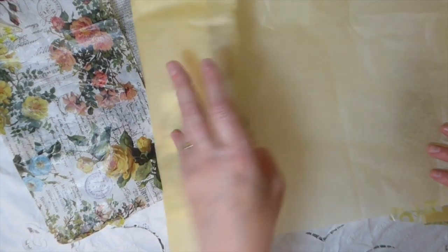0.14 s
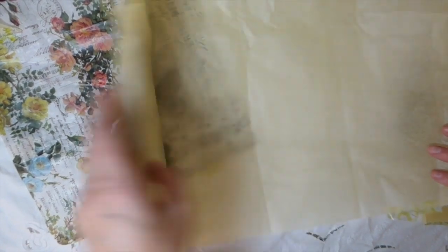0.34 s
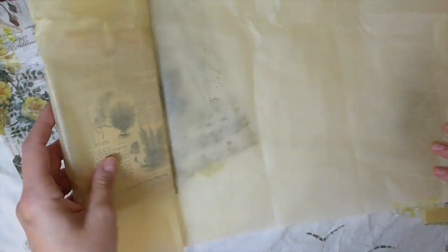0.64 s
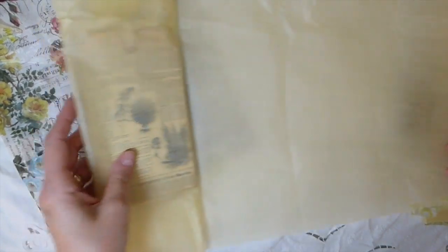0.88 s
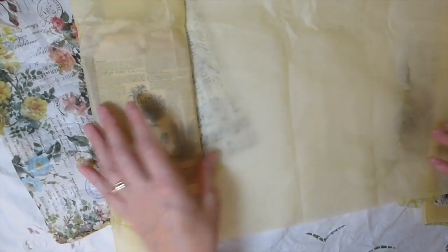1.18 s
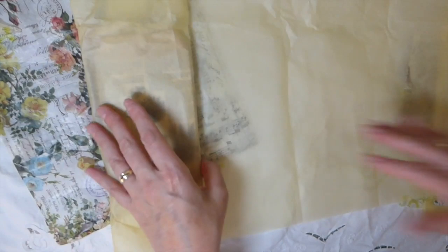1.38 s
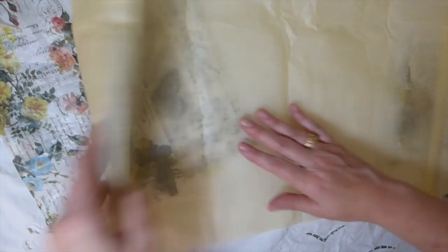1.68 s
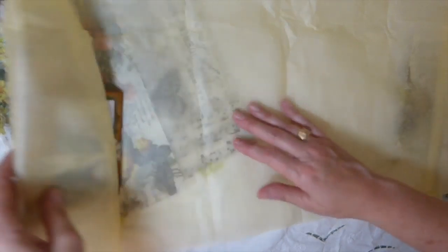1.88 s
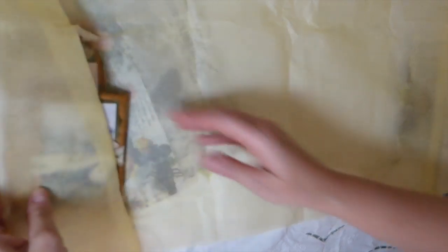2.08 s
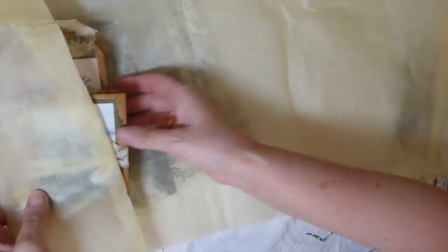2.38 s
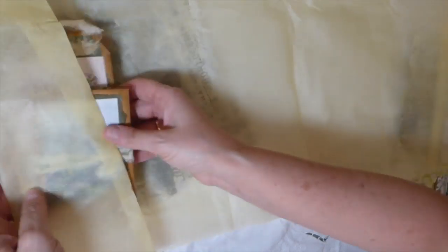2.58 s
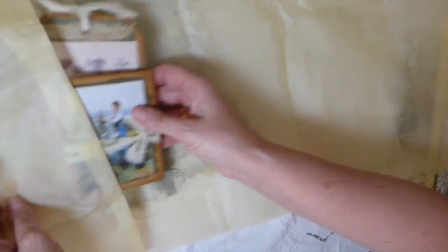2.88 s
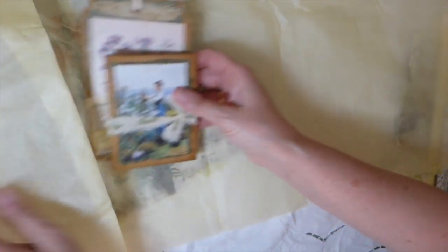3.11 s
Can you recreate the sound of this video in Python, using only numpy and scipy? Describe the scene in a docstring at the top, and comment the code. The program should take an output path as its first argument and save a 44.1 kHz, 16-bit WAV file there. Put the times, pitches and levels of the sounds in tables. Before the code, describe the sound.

Crisp thin paper crackling and sliding close up while being unfolded by hand indoors

```python
"""From the start, thin tissue paper is folded open by hand on a table, heard close up in a small room.
Creases snap as short noise bursts over a crackle of tiny ones; sheets slide and flap as coloured noise.
Soon light knocks of bellying paper and of the card frames inside join in, as damped resonances.
Later, short swells of resonant noise colour a few moments, and whole folds crumple in gritty swells.
Faint, steady noise is the air of the room throughout."""
import sys
import numpy as np
from scipy import signal
from scipy.fft import rfft, irfft, next_fast_len
from scipy.io import wavfile
from scipy.ndimage import uniform_filter1d, map_coordinates

SR = 44100
rng = np.random.default_rng(int(sys.argv[2]) if len(sys.argv) > 2 else 0)


def persist_wave(psi):
    """Save psi, clipped to +-1, as 16-bit WAV."""
    counts = np.round(np.clip(psi, -1, 1) * 32767).astype(np.int16)
    wavfile.write(sys.argv[1], SR, np.atleast_2d(counts).T)


N = 143325  # samples, 3.25 s


def amp(db):
    """Turn decibels into gain."""
    return 10 ** (np.asarray(db) / 20)


def unit(x):
    """Scale to an rms of 1."""
    return x / np.sqrt(np.mean(x ** 2) + 1e-20)


def along(points, hz):
    """Read a value between (Hz, value) points, with frequency on a log axis."""
    f, v = np.transpose(points)
    return np.interp(np.log(hz + 1), np.log(f + 1), v)


def filtered(x, response):
    """Multiply the spectrum of x by a response that depends on frequency."""
    m = next_fast_len(N + SR // 2)
    return irfft(rfft(x, m) * response(np.fft.rfftfreq(m, 1 / SR)), m)[..., :N]


def coloured(x, spectrum, size=4096):
    """Give x a spectrum without ringing ahead of time, keeping the power of white noise."""
    cepstrum = irfft(np.log(amp(along(spectrum, np.fft.rfftfreq(size, 1 / SR)))))
    # folding the second half onto the first makes the filter minimum phase
    cepstrum[1:size // 2] *= 2
    cepstrum[size // 2 + 1:] = 0
    ring = irfft(np.exp(rfft(cepstrum)))
    return signal.fftconvolve(x, ring[None] / np.linalg.norm(ring), axes=1)[:, :N]


def wobble(rate, at):
    """Draw a smooth random curve with rate knots per unit of at."""
    return map_coordinates(rng.standard_normal(size=4096), [at * rate], mode="wrap")


def swells(events, t):
    """Add up bell-shaped swells, each given by its peak time, level and half width."""
    return sum(amp(db) * np.exp(-.5 * ((t - s) / width) ** 2) for s, db, width in events)


def noise(apart):
    """Make stereo noise; apart is the side signal over the middle one."""
    mid, side = rng.standard_normal((2, N))
    return np.array([mid + apart * side, mid - apart * side])


def add(track, s, sound):
    """Mix a sound into a track at s seconds."""
    part = track[:, max(round(s * SR), 0):][:, :sound.shape[-1]]
    part += sound[..., :part.shape[1]]


TICK_DB, TICK_S = -2, .0007  # first instant of a buckle, over the burst that follows: dB, decay in s
TABLE_ECHO = 0.37  # gain of the mirror image of each facet in the table


def burst(rise, hold, t60, uneven_db, apart, pan_db, size=2048):
    """One facet of paper gives way: a sharp tick, then a spiky noise burst with a colour of its own."""
    t, hz = np.arange(size) / SR, np.fft.rfftfreq(size, 1 / SR)
    decay = amp(-60 * np.maximum(t - hold, 0) / t60)
    shape = (1 - np.exp(-t / rise)) * (decay + amp(TICK_DB) * np.exp(-t / TICK_S))
    spikes = amp(1.45 * wobble(1720, t))
    mid, side = rng.standard_normal((2, size)) * shape * spikes

    delay = rng.uniform(.0002, .002)  # s, the echo off the table
    echo = 1 + TABLE_ECHO * np.exp(-2j * np.pi * hz * delay)
    colour = amp(uneven_db * wobble(9.3, np.log(hz + 900))) * echo
    mid, side = irfft(rfft(np.roll([mid, side], 16, axis=1)) * colour)

    pan = amp(pan_db * rng.normal() * np.array([[.5], [-.5]]))
    level = np.sqrt(.004 * SR) / np.linalg.norm(mid)  # the energy of 4 ms at level 1
    return pan * np.array([mid + apart * side, mid - apart * side]) * level


# Creases that buckle. Each row: start in seconds, level in dB.
SNAPS = [(0.056, -35.5), (0.081, -36.5), (0.1162, -31), (0.1577, -34), (0.241, -37.5), (0.2662, -34),
         (0.2714, -27.5), (0.2924, -31.5), (0.3653, -30.5), (0.3701, -28.5), (0.439, -23), (0.455, -27.5),
         (0.5414, -33), (0.6039, -33.5), (0.6475, -33.5), (0.6793, -33.5), (0.6915, -29.5), (0.759, -38),
         (0.7915, -28), (0.8029, -31), (0.8636, -35.5), (0.915, -37), (0.9305, -38), (0.9784, -36.5),
         (1.007, -23), (1.064, -25.5), (1.144, -32.5), (1.1633, -36.5), (1.1823, -35.5), (1.2607, -38.5),
         (1.3146, -30), (1.319, -30), (1.3522, -34), (1.3846, -30.5), (1.4588, -29.5), (1.505, -29.5),
         (1.556, -25.5), (1.59, -27), (1.6285, -26.5), (1.691, -27), (1.7566, -26.5), (1.7764, -25),
         (1.7896, -30), (1.8282, -27.5), (1.835, -27.5), (1.8478, -25), (1.857, -25), (1.9333, -29.5),
         (1.955, -33), (1.961, -31), (1.9695, -30.5), (1.996, -31), (2.0723, -25), (2.095, -34.5),
         (2.174, -38.5), (2.2239, -33.5), (2.3377, -29), (2.359, -28.5), (2.417, -27), (2.441, -33.5),
         (2.554, -36), (2.607, -34.5), (2.6102, -30), (2.6694, -32.5), (2.716, -35), (2.7311, -28.5),
         (2.776, -32.5), (2.8006, -26.5), (2.8358, -28), (2.877, -27), (2.8854, -29), (2.935, -32),
         (2.9869, -27.5), (3.018, -33), (3.09, -38), (3.103, -39), (3.1191, -24.5)]
# The bright colour of cracking paper. Each row: frequency in Hz, relative strength per Hz in dB.
CRACK = [(80, -82), (300, -17.5), (1000, -14), (2200, -8.5), (4000, -4.5), (6000, -3), (8200, -5.5),
         (10000, 4.5), (11300, -1.5), (13000, -13.5), (15200, -24.5)]
# The duller colour of a flapping sheet. Each row: frequency in Hz, relative strength per Hz in dB.
FLAP = [(30, -26), (100, -37), (150, -10.5), (300, -5), (500, -1.5), (850, 3), (1400, 2), (2000, -3),
        (3500, -7), (8000, -32.5)]
SNAP_RISE_S, SNAP_HOLD_S, SNAP_T60_S = .00012, .0016, .02  # hold and decay of a typical crack
FLAP_T60_S, SNAP_FLAP_DB = .028, -15.5  # decay of the flap, and its level against the crack


def snaps():
    """Each crease cracks as it buckles and makes the sheet around it flap."""
    cracks, flaps = np.zeros((2, 2, N))
    for s, db in SNAPS:
        length = np.exp(0.1 * rng.normal())
        crack = burst(SNAP_RISE_S, SNAP_HOLD_S * length, SNAP_T60_S * length,
                      uneven_db=1.9, apart=.33, pan_db=2)
        flap = burst(SNAP_RISE_S, SNAP_HOLD_S, FLAP_T60_S, uneven_db=2.5, apart=.25, pan_db=2)
        add(cracks, s, amp(db) * crack)
        add(flaps, s, amp(db + SNAP_FLAP_DB) * flap)
    return coloured(cracks, CRACK) + coloured(flaps, FLAP)


# Whole folds that crumple at once. Each row: time of the peak in seconds, level in dB,
# half width in seconds.
CRUMPLES = [(1.685, -27.5, 0.0075), (1.783, -31, 0.014), (2.394, -32, 0.0098), (2.741, -35, 0.01),
            (2.835, -28, 0.012)]
CRUMPLE_LOW_DB = -13.5  # the flapping part, against the cracking part


def crumples():
    """Many creases give way together in a brief, gritty swell of noise."""
    t = np.arange(N) / SR
    grit = swells(CRUMPLES, t) * unit(amp(2.4 * wobble(1000, t)))
    high = coloured(grit * noise(apart=0.41), CRACK)
    low = coloured(grit * noise(apart=0.12), FLAP)
    return high + amp(CRUMPLE_LOW_DB) * low


# The sliding sheets. Each row: time in seconds, level in dB.
RUSTLE = [(0.0, -40), (0.06, -44), (0.1, -34.5), (0.15, -48.5), (0.165, -42), (0.23, -39.5), (0.258, -46.5),
          (0.28, -36), (0.33, -40.5), (0.38, -34.5), (0.59, -42.5), (0.63, -47), (0.68, -40.5),
          (0.74, -44.5), (0.79, -40), (0.84, -47.5), (0.91, -53), (0.96, -38.5), (0.99, -44.5),
          (1.09, -32.5), (1.21, -51), (1.23, -55.5), (1.3, -48), (1.34, -38), (1.44, -42), (1.47, -39),
          (1.62, -33.5), (1.73, -36), (1.86, -34), (1.93, -41.5), (1.99, -41.5), (2.06, -44), (2.1, -41.5),
          (2.18, -52.5), (2.26, -49), (2.28, -40), (2.41, -40), (2.46, -42), (2.56, -46.5), (2.62, -39),
          (2.71, -42), (2.729, -35.5), (2.83, -40.5), (2.87, -42), (3.0, -38), (3.08, -45), (3.12, -36.5),
          (3.24, -50.5)]
# The low rustle of the whole sheet, apart from the share that follows the sliding.
# Each row: time in seconds, level in dB.
LOW_RUSTLE = [(0, -12), (.85, -11), (1.3, -15), (1.8, -10), (1.95, -12.5), (2.78, -12), (3.0, -8),
              (3.2, -17.5)]
# The colour of sliding and crackling paper. Each row: frequency in Hz, relative strength per Hz in dB.
HISS = [(80, -84), (300, -43), (1100, -10.5), (2400, -1.5), (4000, -2), (6000, -2.5), (8200, -4.5),
        (10000, 1), (11300, -2.5), (13000, -12.5), (15200, -26.5)]
LOW_FOLLOWS = .85  # dB of low rustle for each dB of sliding
SLIDE_DB, CRACKLE_DB = -0.5, -3.5  # the mix of the high part
LOW_RUSTLE_DB, LOW_CRACKLE_DB = -2.5, -5  # the mix of the low part


def rustle():
    """The sheets slide with a fine grain, and crackle as much as they move."""
    t = np.arange(N) / SR
    slide_db = np.interp(t, *np.transpose(RUSTLE))
    low_db = np.interp(t, *np.transpose(LOW_RUSTLE)) + LOW_FOLLOWS * slide_db
    grain = unit(amp(2.0 * wobble(900, t) + 2.23 * wobble(140, t)))
    slide = grain * noise(apart=0.38)
    sway = grain * noise(apart=0.34)
    ticks = crackle()
    high = coloured(amp(SLIDE_DB) * slide + amp(CRACKLE_DB) * ticks, HISS)
    low = coloured(amp(LOW_RUSTLE_DB) * sway + amp(LOW_CRACKLE_DB) * ticks, FLAP)
    return high * amp(slide_db) + low * amp(low_db)


CRACKLE_PER_S, CRACKLE_SPREAD_DB, CRACKLE_T60_S = 230, 3, 0.012  # average rate, spread, decay


def crackle(size=1200):
    """Tiny creases give way at random, a few large among many small."""
    track = np.zeros((2, N))
    draws = rng.random((size, 2))
    times = np.cumsum(.25 + 1.5 * draws[:, 0]) / CRACKLE_PER_S
    for s, chance in zip(times[times < N / SR], draws[:, 1]):
        strength = amp(CRACKLE_SPREAD_DB * min(-np.log(chance), 2.8))
        tick = burst(0.00019, 0.00023, CRACKLE_T60_S, uneven_db=2, apart=0.22, pan_db=4.5)
        add(track, s, strength * tick)
    return unit(track)


PATCHY_DB = 2.07  # how strongly the bending sheet favours ever different frequencies


def patchy(x, size=1024, count=4):
    """Brief resonances come and go as the sheet changes shape: random gains over time and frequency."""
    z = signal.stft(x, nperseg=size)[2]
    field = rng.standard_normal(z.shape[1:])
    field = uniform_filter1d(uniform_filter1d(field, count, 0), count, 1)
    gains = unit(amp(PATCHY_DB * unit(field)))
    return signal.istft(z * gains, nperseg=size)[1][:, :N]


# Short swells of resonant noise. Each row: time of the peak in seconds, level in dB,
# half width in seconds, pitch in Hz.
RESONANT_SWELLS = [(1.066, -34.5, 0.011, 3100), (1.327, -40, 0.008, 1150), (1.476, -38, 0.01, 1140),
                   (2.607, -41, 0.006, 1000), (2.662, -40, 0.0062, 1300), (2.838, -37, 0.0069, 940)]
SWELL_Q = 1.48  # sharpness of each of two passes


def resonant_swells():
    """Short swells of noise, each in one broad resonance, colour the rustle and snaps at a few moments."""
    t, track = np.arange(N) / SR, np.zeros((2, N))
    for s, db, width, hz in RESONANT_SWELLS:
        b, a = signal.iirpeak(hz, SWELL_Q, SR)
        grit = noise(apart=0.3) * amp(1.7 * wobble(400, t))
        resonant = signal.lfilter(b, a, signal.lfilter(b, a, grit))
        track += swells([(s, db, width)], t) * unit(resonant)
    return track


# Pitched pops of the bellying sheet and of the card inside it.
# Each row: start in seconds, level in dB, pitch in Hz.
KNOCKS = [(.4395, -32.5, 1890), (.456, -41, 2520), (0.542, -40.5, 844), (.792, -36.5, 880),
          (0.8028, -33, 6030), (1.319, -33.5, 2800), (1.505, -35, 5200), (2.189, -43, 1800),
          (2.339, -35.5, 870), (2.389, -34.5, 1290), (3.0179, -32, 1190)]
KNOCK_RISE_S, KNOCK_HOLD_S, KNOCK_T60_S = .0002, .0015, .026  # the push
KNOCK_Q = 1.6  # sharpness of each of two passes


def knocks():
    """Each pop or light contact excites one broad, quickly damped resonance."""
    track = np.zeros((2, N))
    for s, db, hz in KNOCKS:
        push = burst(KNOCK_RISE_S, KNOCK_HOLD_S, KNOCK_T60_S, uneven_db=3, apart=0.15, pan_db=1)
        b, a = signal.iirpeak(hz, KNOCK_Q, SR)
        ring = signal.lfilter(b, a, signal.lfilter(b, a, push))
        add(track, s, amp(db) * ring * np.linalg.norm(push) / np.linalg.norm(ring))
    return track


# How long the room rings. Each row: frequency in Hz, time to fall by 60 dB in seconds.
ROOM = [(200, 0.47), (1500, 0.23), (12000, 0.057)]
ROOM_DB, TABLE_DB = -14.5, -16  # the tail; the early echoes taken together


def room(x, count=8):
    """Early echoes come off the table and nearby things, then a short tail of fading noise."""
    hz, t, z = signal.stft(rng.standard_normal((2, SR // 3)), SR, nperseg=256)
    fade = amp(-60 * t / along(ROOM, hz)[:, None])
    tail = signal.istft(z * fade, SR, nperseg=256)[1]
    # the tail waits 5 ms
    answer = amp(ROOM_DB) * np.pad(tail / np.linalg.norm(tail[0]), ((0, 0), (SR // 200, 0)))
    for ear in answer:
        places = (rng.uniform(.002, .016, count) * SR).astype(int)
        ear[places] += amp(TABLE_DB) * rng.choice([-1, 1], count) / np.sqrt(count)
    return signal.fftconvolve(x, answer, axes=1)[:, :N]


# The colour of the room's air. Each row: frequency in Hz, relative strength per Hz in dB.
AIR = [(25, -15), (150, 2.5), (400, 2), (2000, -9.5), (15000, -21)]
AIR_DB = -66


def room_air():
    """The quiet room gives a faint, steady noise, strongest in the lows."""
    return amp(AIR_DB) * coloured(noise(apart=0.57), AIR)


# Where the paper lies. Each row: frequency in Hz, left minus right in dB.
BALANCE_DB = [(120, -1.5), (600, 2), (1500, 2.5), (3000, 0.5), (10000, 1.5), (14000, .7)]
DRIFT_DB_PER_S = .5  # the sheet is drawn to the left


def scene():
    """The paper lies mostly a little to the left and drifts further left, in a quiet room."""
    paper = snaps() + crumples() + knocks() + resonant_swells() + patchy(rustle())
    sides, t = np.array([[.5], [-.5]]), np.arange(N) / SR
    placed = filtered(paper + room(paper), lambda hz: amp(sides * along(BALANCE_DB, hz)))
    drift = amp(sides * DRIFT_DB_PER_S * (t - t.mean()))
    return placed * drift + room_air()


TOP_HZ = 15900


def record(dry):
    """A sharp band limit removes everything from its top frequency up."""
    return filtered(dry, lambda hz: hz < TOP_HZ)


dry = scene()
out = record(dry)
persist_wave(out)
```